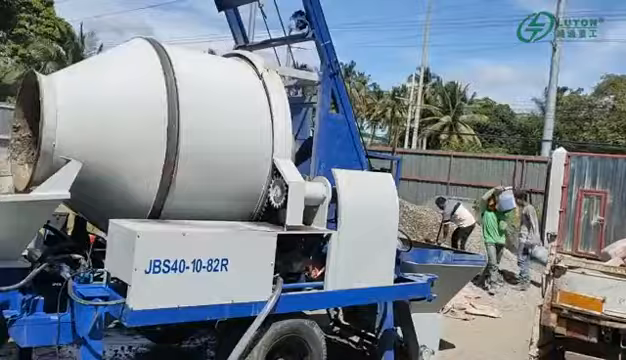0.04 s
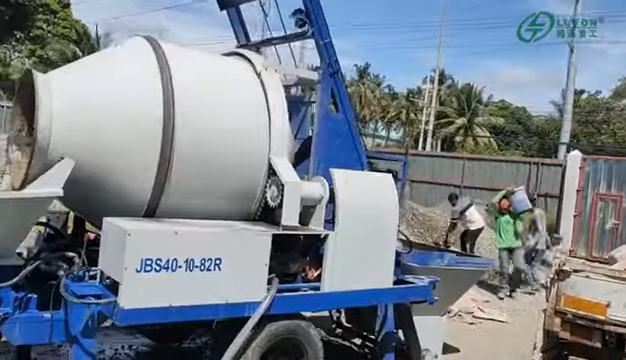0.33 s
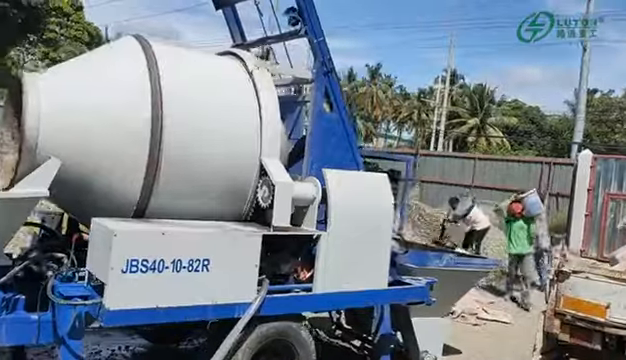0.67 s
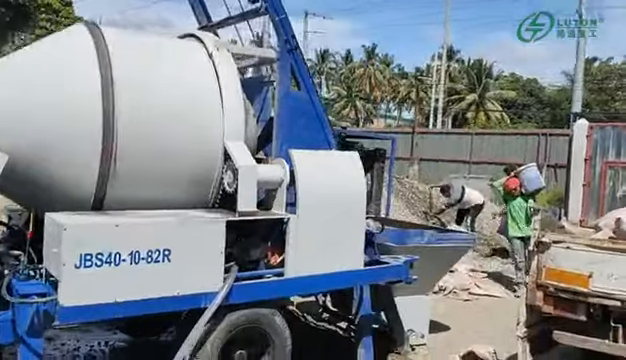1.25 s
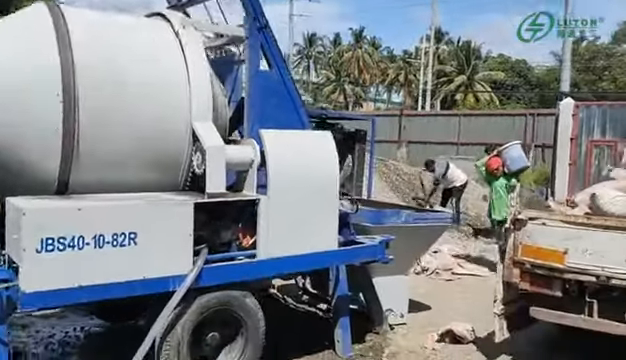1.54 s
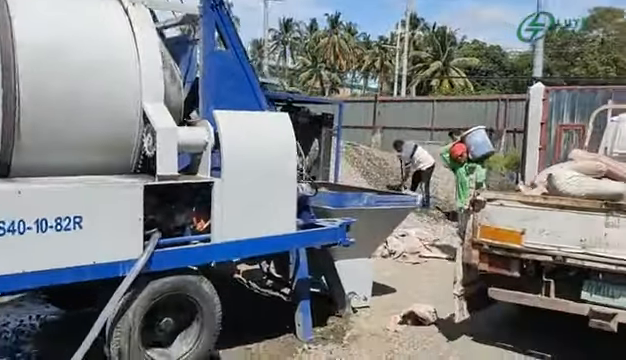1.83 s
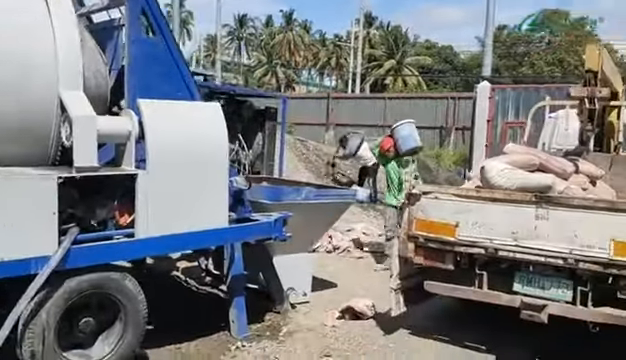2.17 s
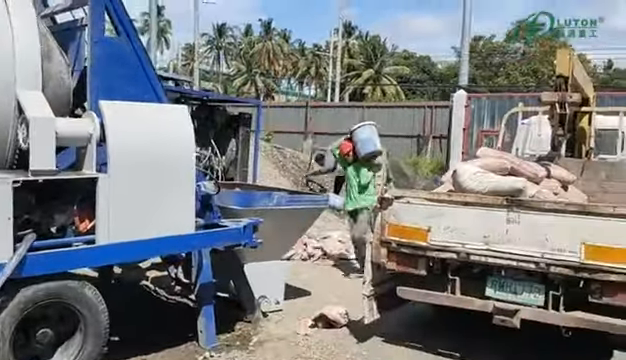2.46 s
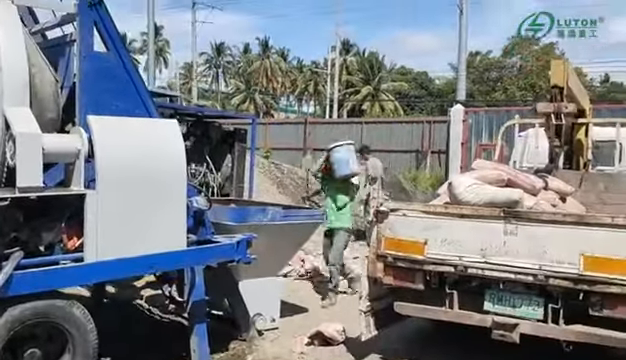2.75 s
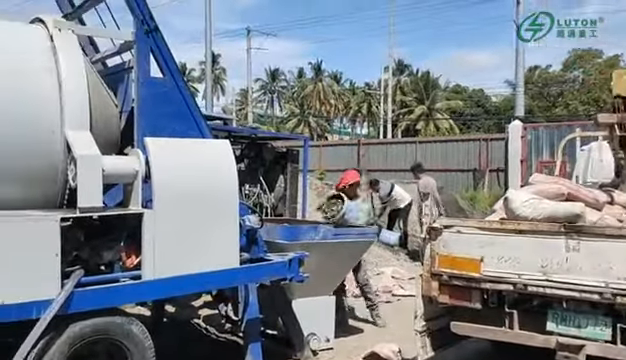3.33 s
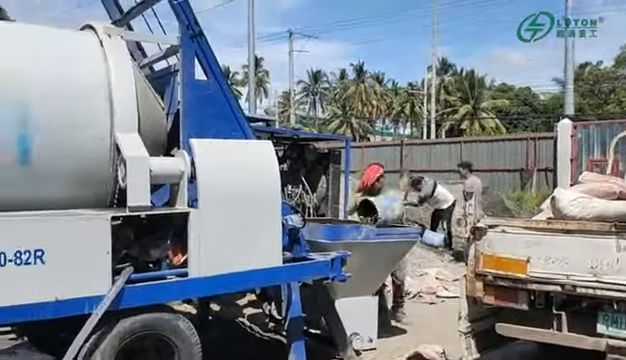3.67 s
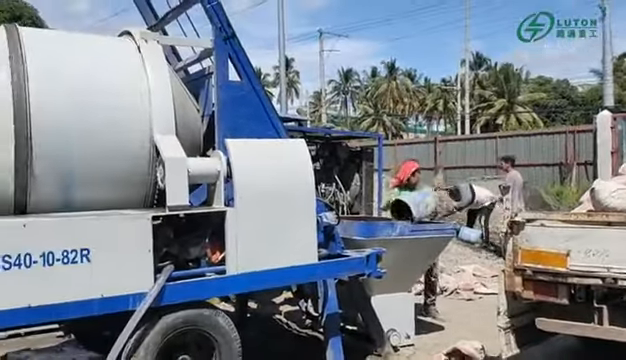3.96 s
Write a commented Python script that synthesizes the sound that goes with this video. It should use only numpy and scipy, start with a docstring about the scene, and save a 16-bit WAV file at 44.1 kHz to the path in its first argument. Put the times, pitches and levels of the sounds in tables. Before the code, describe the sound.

A diesel concrete pump and drum mixer running loudly, gravel churning, with two short gushes.

```python
"""Diesel concrete pump with drum mixer

Under load on an open building site: the engine drones and clatters, the hydraulic pump's pistons whine,
wet gravel churns and slumps in the steel drum, sand hisses on its wall. Twice the valve changes stroke
with a hollow knock and a short, rough gush; stones rattle in the pipe. A fence and a truck echo."""
import sys
import numpy as np
from scipy import signal
from scipy.fft import rfft, irfft
from scipy.io import wavfile
from scipy.ndimage import uniform_filter1d

SR = 44100
rng = np.random.default_rng(int(sys.argv[2]) if len(sys.argv) > 2 else 0)


def unload_audio(sound):
    """Save the sound as a 16-bit wav file, at the path given as the first command line argument."""
    columns = np.transpose(np.atleast_2d(sound))
    # keep every value between -1 and 1, then stretch to whole-number steps
    steps = np.round(np.clip(columns, -1, 1) * 32767)
    wavfile.write(sys.argv[1], SR, steps.astype(np.int16))


N = 176400
T = np.arange(N) / SR
CRANK_HZ, PISTON_HZ, CUTOFF_HZ = 33.21, 257.86, 7600
LEFT_RIGHT = np.array([[1], [-1]])

# engine and cooling fan lines (crank multiple, level [dB]); fan relative to FAN_LEVEL
ENGINE_ORDERS = [(1, -43.5), (4, -45), (5, -46.5)]
FAN_ORDERS = [(8, -1), (9, 1.5)]
# engine envelopes (time [s], level [dB])
EXHAUST_LEVEL = [(.1, -41.5), (.4, -32), (.85, -38), (1.2, -41), (1.65, -44), (2.0, -39), (2.35, -45.5),
                 (2.75, -37), (2.91, -31.5), (3.05, -39.5), (4, -41.5)]
FAN_LEVEL = [(.1, -39.5), (1.9, -47.5), (2.4, -37.5), (3.0, -39), (3.3, -33.5), (4, -38.5)]
RUMBLE_LEVEL = [(.1, -33.5), (.55, -33.5), (.8, -41.5), (1.15, -37), (1.35, -31), (1.6, -33.5),
                (2.05, -32.5), (2.35, -32.5), (2.55, -32), (2.8, -28.5), (3.0, -33), (3.25, -29.5),
                (3.5, -32.5), (4, -32)]
CLATTER_LEVEL = [(.1, -39.5), (1.7, -42.5), (2.1, -37), (2.5, -33.5), (3.0, -35), (3.5, -34), (4, -32.5)]
# exhaust and block rumble (frequency [Hz], relative density [dB])
RUMBLE_SPECTRUM = [(18, -28.5), (30, -6), (45, -3.5), (66, -1), (85, -12.5), (110, -11), (150, 1.5),
                   (215, -2.5), (300, -3), (420, -5), (900, -33.5)]

# pump partials 1-5 (time [s], level [dB])
HUM_LEVEL = [(.1, -41), (.36, -39.5), (.47, -28.5), (.68, -29), (.78, -34.5), (1.0, -34), (1.35, -40.5),
             (2.15, -33), (2.7, -44), (3.3, -37), (4, -33)]
SECOND_LEVEL = [(.1, -47), (.3, -30.5), (.55, -49), (.83, -29), (1.15, -52), (1.5, -34.5), (1.92, -33),
                (2.151, -42.5), (2.5, -39), (2.75, -39), (3.05, -32.5), (3.4, -41.5), (4, -37.5)]
THIRD_LEVEL = [(.1, -39), (.27, -34.5), (.7, -37), (1.15, -38.5), (1.6, -38.5), (1.9, -32.5), (2.06, -39),
               (2.2, -31.5), (2.4, -43), (3.1, -38.5), (3.5, -37), (4, -35)]
WHISTLE_LEVEL = [(.1, -32), (.21, -29), (.4, -37.5), (.52, -32.5), (.68, -40), (.92, -34), (1.02, -38.5),
                 (1.3, -35.5), (1.45, -27), (1.62, -28.5), (1.76, -39), (1.95, -29), (2.12, -34.5),
                 (2.26, -29), (2.45, -31), (2.68, -36), (3.1, -34), (3.68, -34.5), (3.82, -27), (4, -27.5)]
FIFTH_LEVEL = [(.1, -41.5), (.6, -39.5), (.95, -40.5), (1.22, -35.5), (1.519, -45), (1.95, -43.5),
               (2.2, -36), (2.5, -46), (3.15, -37), (3.63, -29.5), (3.85, -36.5), (4, -38.5)]
# upper pump partials (piston rate multiple, level [dB], left phase lead [rad])
WHINE_ORDERS = [(6, -42.5, 0.64), (7, -44, 1.6), (8, -52.5, 1.8), (9, -56, 1.7), (11, -51.5, 0)]

# rolling load, slumping gravel, sand on steel (frequency [Hz], relative density [dB])
CHURN_SPECTRUM = [(150, -29.5), (280, -1), (400, -3), (480, 0.5), (570, -1), (690, 2), (840, -3.5),
                  (950, -1.5), (1080, 0.5), (1200, -3.5), (1400, -4), (1700, -9), (2000, -9.5),
                  (3000, -20.5), (7500, -34.5)]
SLUMP_SPECTRUM = [(120, -2), (200, -9), (450, -1.5), (900, 7), (1400, -15.5), (2500, -13), (7500, -35.5)]
HISS_SPECTRUM = [(700, 0.5), (1500, 3.5), (2200, 2), (3000, 0.5), (4300, 0.5), (5200, 0.5), (6500, -1.5),
                 (7600, -3)]
# drum envelopes (time [s], level [dB])
CHURN_LEVEL = [(.1, -26.5), (1.1, -27.5), (2.3, -28), (3.3, -26), (4, -26.5)]
HISS_LEVEL = [(.1, -29), (.22, -32.5), (.5, -29.5), (.75, -31), (1.05, -31.5), (1.3, -30.5), (1.75, -30),
              (2.1, -29.5), (2.5, -28), (3.0, -29.5), (3.3, -28.5), (3.75, -31), (4, -31)]
# gravel off the blades; stones in the pipe (peak time [s], level [dB])
SLUMPS = [(.47, -32.5), (.82, -35.5), (.9, -32), (1.245, -26.5), (1.7, -38), (2.08, -30), (2.48, -26.5),
          (2.58, -33), (2.85, -30.5), (3.26, -26), (3.42, -27.5), (3.65, -29.5), (3.94, -24.5)]
RATTLES = [(2.78, -34.5), (2.865, -30), (2.915, -29), (3.2, -39), (3.79, -34)]

# stroke changes (gush time [s], gush level [dB], gush rise [s], gush fall [s],
# spray and ring time [s], spray level [dB], ring level [dB], knock level [dB])
STROKES = [(0.311, -23.5, 0.029, 0.05, 0.328, -24.5, -33, -21.5),
           (2.714, -23, 0.059, .08, 2.722, -23.5, -25, -30)]
# surge through the valve; its spray (frequency [Hz], relative density [dB])
GUSH_SPECTRUM = [(90, -8.5), (160, -.5), (300, 2), (480, -2.5), (700, 1), (1050, -1), (1500, -11.5),
                 (4000, -18.5)]
SPRAY_SPECTRUM = [(1000, -0.5), (2300, 3), (3500, 4), (5000, -1.5), (6300, 7), (7500, 3)]
# engine bay panels, delivery pipe, hopper (frequency [Hz], bandwidth [Hz], relative level [dB])
PANEL_MODES = [(2364, 140, -2.5), (2540, 100, 0.5), (2730, 93, -3.5), (3044, 240, 2.5), (3544, 330, 5),
               (3876, 270, 4), (4143, 140, 0), (7010, 110, -5.5)]
PIPE_MODES = [(1850, 310, 1), (2400, 130, -0.5), (3180, 200, -0.5), (7100, 97, -24.5)]
HOPPER_MODES = [(373, 160, -2), (496, 130, 2.5), (773, 190, -2), (1030, 140, -5.5)]

# fence and parked truck (delay [s], gain [dB])
ECHOES = [(.0071, -23.5), (0.0176, -17)]
# stereo balance (frequency [Hz], left over right [dB])
LEFT_TILT = [(100, 3), (600, 0.1), (1200, 1), (2200, -0.1), (3000, 1.5), (4700, 1.4), (6000, 0),
             (7500, 0.3)]
# stereo width (frequency [Hz], side over mid [dB])
WIDTH = [(30, -22.5), (65, -31), (110, -30), (160, -26), (260, -13), (400, -9.5), (650, -5), (900, -2),
         (1350, -1), (1750, 1.9), (2400, -2), (3700, -2), (4700, -1.3), (6000, -2), (7400, -2.5)]


def engine():
    """Crank orders, exhaust note and fan lines; rumble and panel clatter pulse on each firing."""
    crank = shaft_angle(CRANK_HZ, wander=0.0032)
    orders = sum(partial(crank, CRANK_HZ, k, db, fade_db=2.0, flutter=0.58) for k, db in ENGINE_ORDERS)
    exhaust = partial(crank, CRANK_HZ, 2, in_time(EXHAUST_LEVEL), fade_db=2.0, flutter=0.5)
    fan = sum(partial(crank, CRANK_HZ, k, db + in_time(FAN_LEVEL), fade_db=4.0, flutter=0.27)
              for k, db in FAN_ORDERS)
    firing = 1 + 0.15 * np.cos(2 * crank)
    rumble = patchy(colour(white() * firing, RUMBLE_SPECTRUM), depth_db=2.0, rate_hz=8.6, bands=9)
    rumble *= from_db(in_time(RUMBLE_LEVEL))
    clatter = steel(grains(per_s=7000, spread_db=0.5) * firing, PANEL_MODES, side=0.44, waver_db=-0.6)
    clatter *= from_db(in_time(CLATTER_LEVEL)) * pan(left_db=1.5)
    return orders + exhaust + fan + rumble + clatter


def hydraulic_pump():
    """Piston pressure ripple: a hum, a whistle two octaves up, and other partials."""
    angle = shaft_angle(PISTON_HZ, wander=0.00077)
    hum = partial(angle, PISTON_HZ, 1, in_time(HUM_LEVEL), fade_db=0.5, flutter=0.13)
    middle = sum(partial(angle, PISTON_HZ, k, in_time(level), fade_db=-0.2, flutter=0.25)
                 for k, level in enumerate([SECOND_LEVEL, THIRD_LEVEL, WHISTLE_LEVEL, FIFTH_LEVEL], 2))
    upper = sum(partial(angle, PISTON_HZ, k, db, fade_db=1.7, flutter=0.61, lead_rad=lead_rad)
                for k, db, lead_rad in WHINE_ORDERS)
    return hum + middle + upper


def drum():
    """Stones roll and slump off the blades; sand hisses on the wall."""
    churn = colour(grains(per_s=7000, spread_db=3.0), CHURN_SPECTRUM)
    churn = patchy(churn, depth_db=4.0, rate_hz=36, bands=17) * from_db(in_time(CHURN_LEVEL))
    sand = white() + 0.53 * grains(per_s=1500, spread_db=0.5)
    hiss = patchy(colour(sand, HISS_SPECTRUM), depth_db=3.5, rate_hz=22, bands=17)
    slumps = colour(grains(per_s=2500, spread_db=1.5), SLUMP_SPECTRUM)
    slumps *= sum(from_db(db) * swell(peak_s, rise_s=0.044, fall_s=0.052) for peak_s, db in SLUMPS)
    hiss *= from_db(in_time(HISS_LEVEL) + 0.5 * drift(30))
    return churn + slumps + hiss


def stroke_changes():
    """The valve swings over: hopper knock, gush, gritty spray, stones rattling in the pipe."""
    gush_env = spray_env = knock_env = 0
    pipe_env = sum(from_db(db) * swell(peak_s, rise_s=0.0098, fall_s=0.023) for peak_s, db in RATTLES)
    for gush_s, gush_db, rise_s, fall_s, spray_s, spray_db, ring_db, knock_db in STROKES:
        gush_env += from_db(gush_db) * swell(gush_s, rise_s, fall_s)
        knock_env += from_db(knock_db) * burst(gush_s + 0.0054, length_s=0.056)
        spray_env += from_db(spray_db) * swell(spray_s, rise_s=0.02, fall_s=0.039)
        pipe_env += from_db(ring_db) * swell(spray_s, rise_s=0.042, fall_s=0.048)
    pipe = steel(grains(per_s=8500, spread_db=6.0), PIPE_MODES, side=0.23, waver_db=3.5)
    hopper = steel(white(), HOPPER_MODES, side=0.39, waver_db=1)
    gush = colour(white(), GUSH_SPECTRUM)
    spray = colour(grains(per_s=11000, spread_db=-4.0), SPRAY_SPECTRUM)
    return knock_env * hopper + gush_env * gush + spray_env * spray + pipe_env * pipe


def yard(x, sway_s=0.00013):
    """Direct sound plus short echoes; their paths shift as the microphone sways."""
    out = x
    for delay_s, db in ECHOES:
        emitted_s = T - delay_s - sway_s * drift(1.0)
        out = out + from_db(db) * np.array([np.interp(emitted_s, T, channel) for channel in x])
    return out


def shaft_angle(hz, wander):
    """Phase [rad] of an uneven rotation; wander is the relative speed deviation."""
    return 2 * np.pi * np.cumsum(hz * (1 + wander * drift(4.16))) / SR


def partial(angle, base_hz, order, db, fade_db, flutter, lead_rad=0):
    """One harmonic with slow fading, fast flutter and a drifting left-right phase."""
    apart_rad = lead_rad / 2 + 0.63 * width_rad(order * base_hz) * drift(9.2)
    amplitude = 1 + flutter * (drift(22) + 1j * drift(28))
    phase = order * angle + rng.uniform(0, 2 * np.pi) + apart_rad * LEFT_RIGHT
    wave = (amplitude * np.exp(1j * phase)).real
    return from_db(db) * unit_rms(wave * from_db(fade_db * drift(2.95)))


def steel(drive, modes, side, waver_db):
    """Driven resonances, each wavering in level; stereo, rms 1."""
    out = 0
    for k, (hz, width_hz, db) in enumerate(modes):
        radius = np.exp(-np.pi * width_hz / SR)
        feedback = [1, -2 * radius * np.cos(2 * np.pi * hz / SR), radius * radius]
        ring = unit_rms(signal.lfilter([1, 0, -1], feedback, drive))
        out += (-1) ** k * from_db(db + waver_db * drift(11)) * ring
    return unit_rms(out[0] + side * out[1] * LEFT_RIGHT)


def grains(per_s, spread_db):
    """Two independent showers of small, uneven impacts; rms 1."""
    sizes = from_db(spread_db * np.minimum(rng.exponential(1, (2, N)), 3)) * np.sign(white())
    return unit_rms(sizes * (rng.random((2, N)) < per_s / SR))


def colour(drive, spectrum):
    """Filter two excitations and mix them as mid and side; rms 1."""
    hz = np.arange(N // 2 + 1) * SR / N
    gain = from_db(at_hz(spectrum, hz)) * (hz < CUTOFF_HZ) * (hz > 10)
    width = width_rad(hz)
    tilt = from_db(at_hz(LEFT_TILT, hz) / 2)
    mid, side = rfft(drive) * gain * np.array([np.cos(width), np.sin(width)])
    return unit_rms(irfft([(mid + side) * tilt, (mid - side) / tilt], N))


def patchy(x, depth_db, rate_hz, bands):
    """Log-spaced bands swell and sink independently; rms 1."""
    spectrum, out = rfft(x), 0
    hz = np.arange(N // 2 + 1) * SR / N
    position = np.interp(np.log(hz + 1), np.log([100, CUTOFF_HZ]), [0, bands - 1])
    for k in range(bands):
        band = irfft(spectrum * np.maximum(1 - abs(position - k), 0), N)
        out += band * from_db(depth_db * np.tanh(drift(rate_hz)))
    return unit_rms(out)


def drift(rate_hz):
    """Noise low-passed at rate_hz; rms 1."""
    step, settle = 40, 2000
    pole = np.exp(-2 * np.pi * step * rate_hz / SR)
    noise = rng.standard_normal(N // step + settle + 2)
    slow = signal.lfilter([1], [1, -2 * pole, pole * pole], noise)[settle:]
    return np.interp(np.arange(N) / step, np.arange(len(slow)), unit_rms(slow))


def swell(peak_s, rise_s, fall_s):
    """Gaussian rise, exponential fall."""
    return np.exp(-(np.minimum(T - peak_s, 0) / rise_s) ** 2 - np.maximum(T - peak_s, 0) / fall_s)


def burst(centre_s, length_s):
    """Flat top, rounded ends."""
    return 1 / (1 + (2 * (T - centre_s) / length_s) ** 10)


def white():
    return rng.standard_normal((2, N))


def width_rad(hz):
    return np.arctan(from_db(at_hz(WIDTH, hz)))


def pan(left_db):
    return from_db(left_db / 2 * LEFT_RIGHT)


def in_time(rows):
    return np.interp(T, *np.transpose(rows))


def at_hz(rows, hz):
    knots_hz, db = np.transpose(rows)
    return np.interp(np.log(hz + 1e-3), np.log(knots_hz), db)


def from_db(db):
    return 10 ** (np.asarray(db) / 20)


def unit_rms(x):
    return x / np.sqrt(np.mean(x ** 2) + 1e-20)


def suppressor(x, slope=0.94, max_cut_db=8.5, makeup_db=0.69):
    """Noise suppressor: cuts patches weaker than their surroundings in frequency and time."""
    frames = signal.stft(x, nperseg=1024, noverlap=768)[2]
    power = np.mean(abs(frames) ** 2, axis=0)
    near = uniform_filter1d(uniform_filter1d(power, size=3, axis=0), size=7, axis=1)
    around = uniform_filter1d(uniform_filter1d(power, size=15, axis=0), size=31, axis=1)
    contrast_db = 10 * np.log10(np.maximum(near, 1e-14) / np.maximum(around, 1e-14))
    gain = from_db(makeup_db + np.clip(slope * contrast_db, -max_cut_db, 0))
    return signal.istft(frames * gain, nperseg=1024, noverlap=768)[1][:, :N]


def scene():
    """The whole machine; only drum and stroke changes echo."""
    return engine() + (hydraulic_pump() + yard(drum() + stroke_changes())) * pan(left_db=-0.05)


def record(dry):
    """Noise suppression, a fade-in after brief silence, steep low-pass."""
    start_s, fade_s = 0.11, 0.015
    opened = suppressor(dry) * np.clip((T - start_s) / fade_s, 0, 1)
    return signal.sosfilt(signal.ellip(14, .1, 90, CUTOFF_HZ, fs=SR, output="sos"), opened)


dry = scene()
out = record(dry)
unload_audio(out)
```